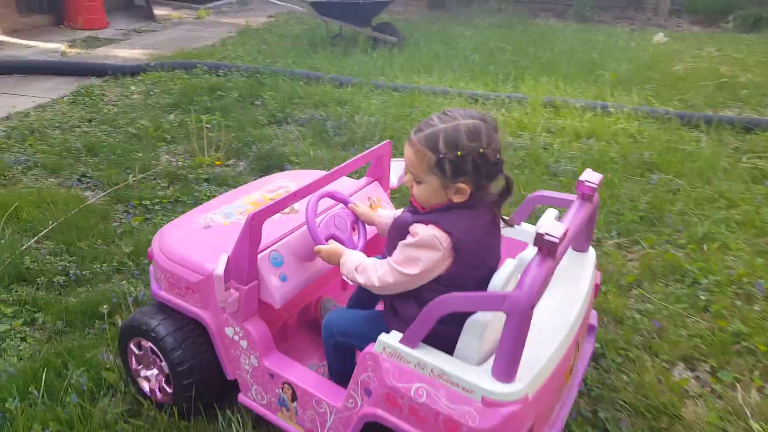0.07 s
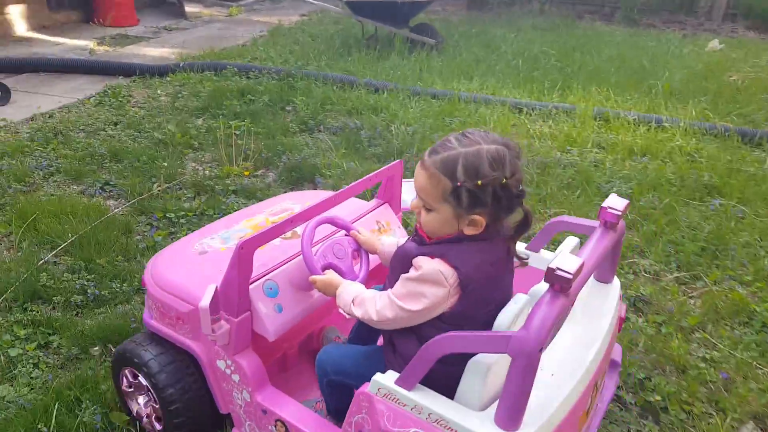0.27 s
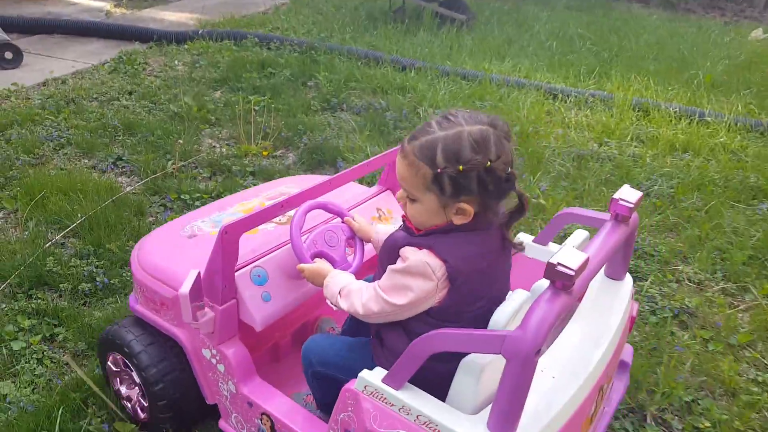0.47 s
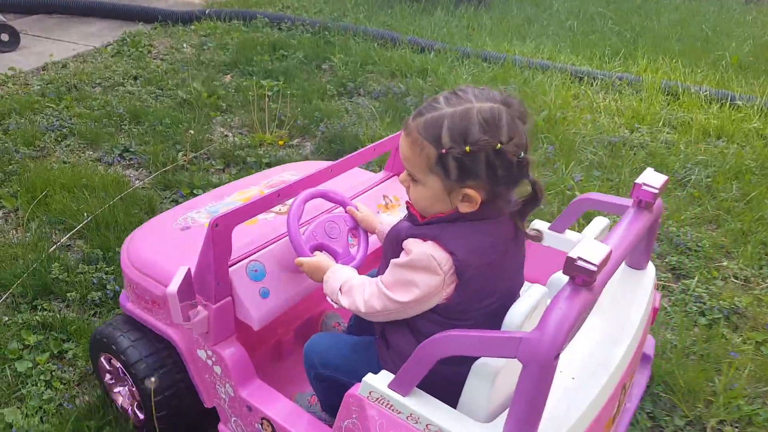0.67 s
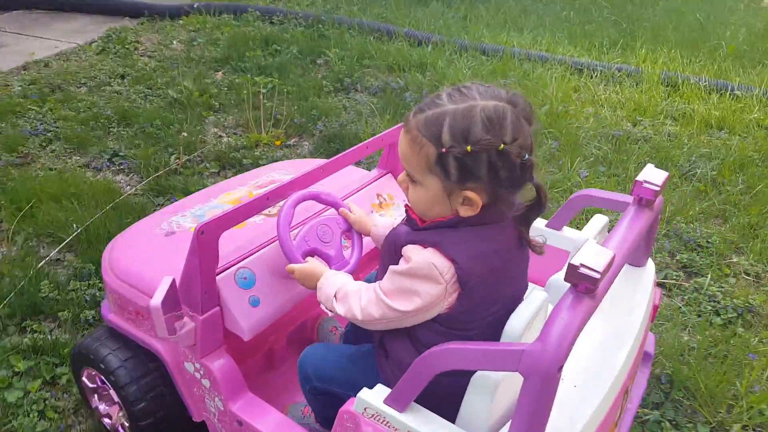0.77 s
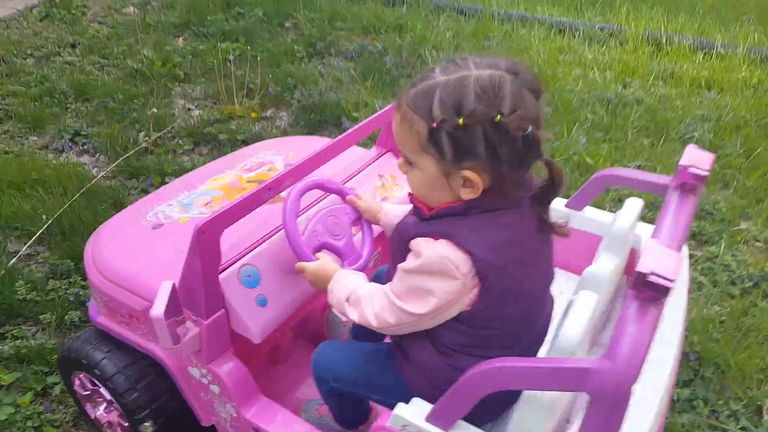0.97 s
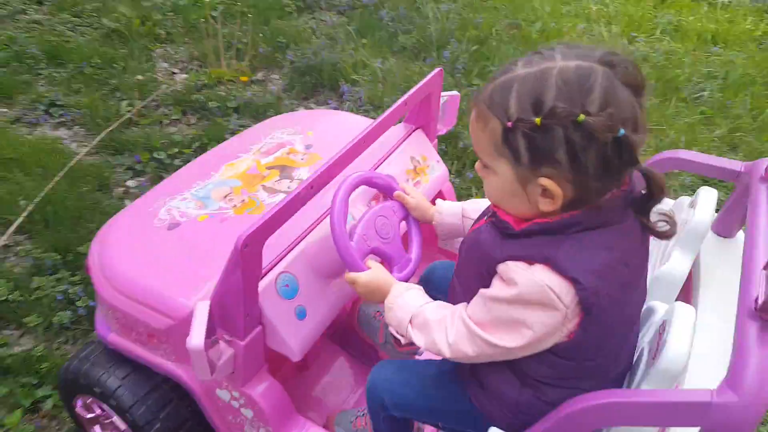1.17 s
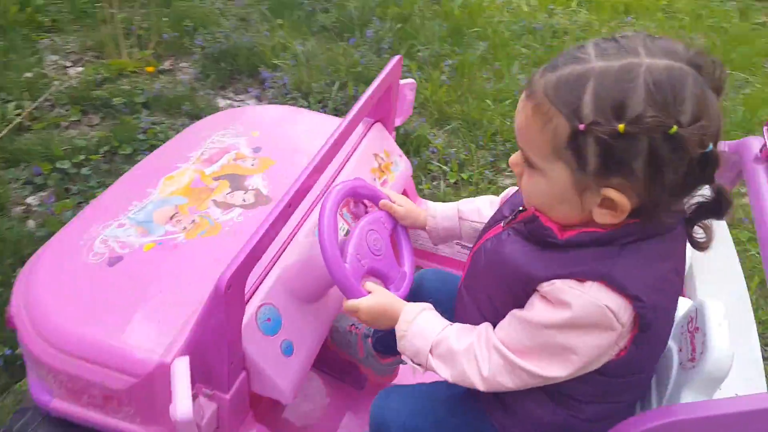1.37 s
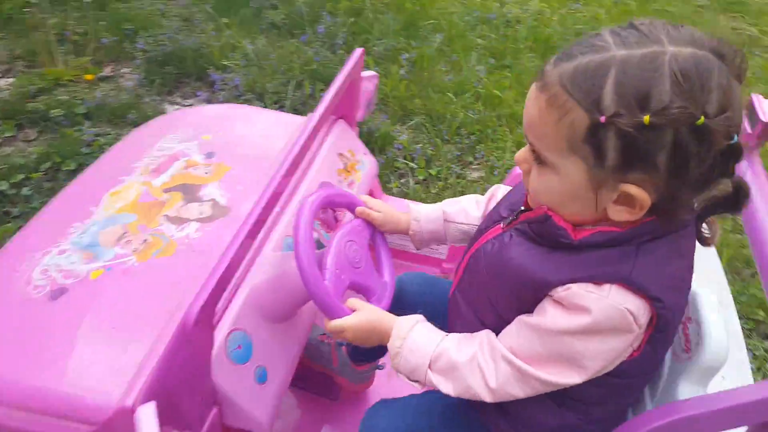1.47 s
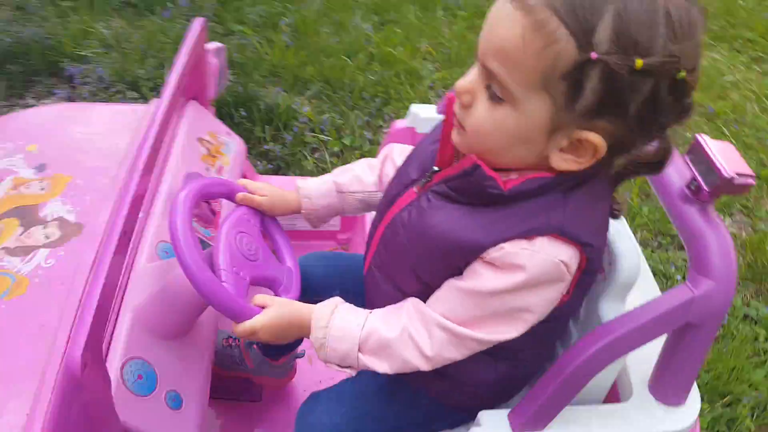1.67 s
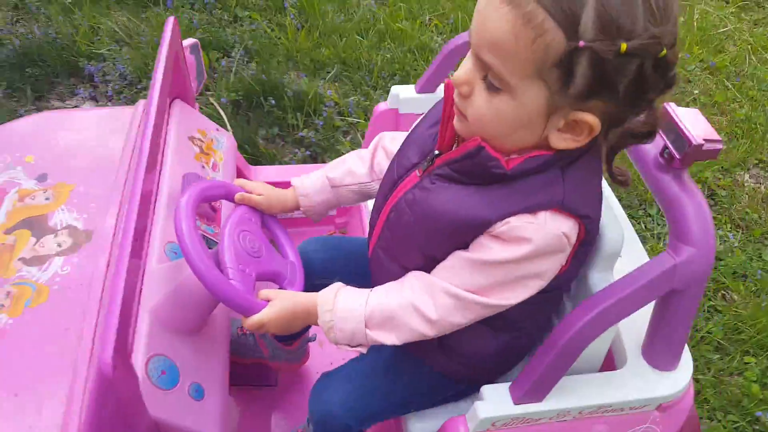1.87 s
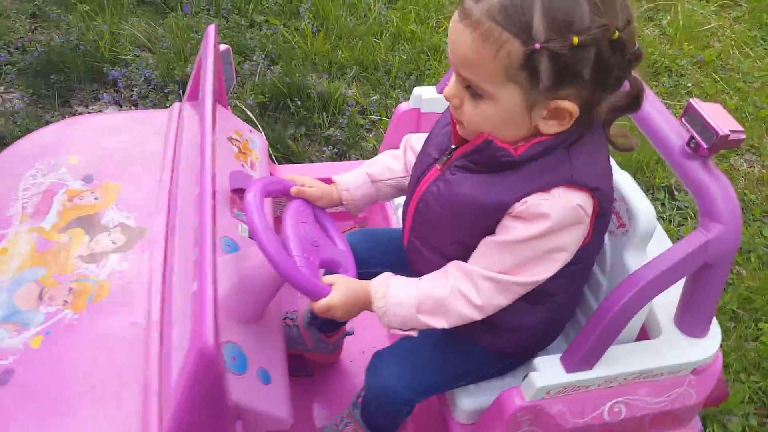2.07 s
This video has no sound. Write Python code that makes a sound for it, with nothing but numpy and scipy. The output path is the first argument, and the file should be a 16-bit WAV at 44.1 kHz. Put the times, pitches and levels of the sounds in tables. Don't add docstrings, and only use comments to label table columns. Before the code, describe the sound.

Close outdoor phone sound of a plastic electric toy car: five short grinding motor bursts with tearing grass, a quieter bumpy coast, one long rising whine that skips, then a heavy thump and rolling.

```python
import sys
import numpy as np
from scipy import signal
from scipy.io import wavfile

SR = 44100
rng = np.random.default_rng(int(sys.argv[2]) if len(sys.argv) > 2 else 0)


def decibels_to_gain(level_db):
    exponent = np.asarray(level_db, float) / 20
    return 10 ** exponent


def to_wav(s):
    ch = np.atleast_2d(s).T
    pcm = np.round(np.clip(ch, -1, 1) * 32767)
    wavfile.write(sys.argv[1], SR, pcm.astype(np.int16))


N = 93800
T = np.arange(N) / SR

# f/Hz, left-right likeness/1
LIKENESS = [(40, 0.5), (80, 0.95), (200, 1), (600, .89), (1300, 0.4), (2500, 0.016), (6000, 0.013)]
# f/Hz, left minus right/dB
LEAN = [(60, 3), (300, -0.5), (1400, 4), (3100, 2), (6000, -10), (9000, 2), (14000, 7)]


def at_hz(points, hz):
    table_hz, value = np.transpose(points)
    return np.interp(np.log(hz), np.log(table_hz), value)


def rms_one(x):
    return x / np.sqrt(np.mean(x ** 2) + 1e-20)


def drift(rate):
    r = np.exp(-40 * np.pi * rate / SR)
    noise = rng.standard_normal(N // 20 + 2002)
    slow = signal.lfilter([1], [1, -2 * r, r * r], noise)[2000:]
    return np.interp(np.arange(N) / 20, np.arange(len(slow)), rms_one(slow))


def swell(s, rise, hold, fall, db):
    before = np.minimum(T - s, 0) / rise
    after = np.maximum(T - s - hold, 0) / fall
    return decibels_to_gain(db) * np.exp(-before ** 2 - after ** 2)


def grains(rate, spread_db):
    excess = np.minimum(rng.exponential(1, (4, N)), 5)
    size = decibels_to_gain(spread_db * excess) * rng.choice([-1, 1], (4, N))
    struck = rng.random((4, N)) < rate / SR
    return (size * struck + 1e-9).reshape(2, 2, N)


def widen(mid, side, hz):
    alike = np.clip(at_hz(LIKENESS, hz), -1, 1)
    return np.sqrt(1 + alike) * mid + np.sqrt(1 - alike) * side * [[1], [-1]]


def coloured(source, spectrum, patchy_db):
    out = 0
    together = drift(14)
    edges = 35 * 2 ** np.arange(0, 9.1, .5)
    for k, (low, high) in enumerate(zip(edges, edges[1:])):
        hz = np.sqrt(low * high)
        if not spectrum[0][0] * .7 < hz < spectrum[-1][0] * 1.1:
            continue
        band = signal.butter(2, [low, high], "band", fs=SR, output="sos")
        mid, side = signal.sosfilt(band, source[k % 2])
        flicker_db = patchy_db * (1.2 * together + drift(40))
        lean_db = at_hz(LEAN, hz) / 2 * np.array([[1], [-1]])
        out = out + decibels_to_gain(at_hz(spectrum, hz) + flicker_db + lean_db) * widen(mid, side, hz)
    return rms_one(out)


def garden_air():
    # f/Hz, level/dB
    air_spectrum = [(40, -2), (144, -3.5), (400, -12.5), (900, -13), (2000, -20.5), (5000, -26.5),
                    (10500, -29.5), (15500, -27.5)]
    air_db = -45.5
    air = coloured(rng.standard_normal((2, 2, N)), air_spectrum, patchy_db=-0.74)
    return decibels_to_gain(air_db + 3.5) * air


def rolling():
    # t/s, level/dB
    roll = [(0, -39.5), (.2, -34.5), (.7, -39.5), (0.868, -32), (1.0, -43.5), (1.098, -47), (1.4, -57.5),
            (1.5, -78), (1.9, -29), (2.12, -35)]
    # f/Hz, level/dB
    roll_spectrum = [(40, -18), (70, -10), (156, -5), (309, -4), (654, -14), (1190, -17), (4000, -43)]
    s, db = np.transpose(roll)
    return decibels_to_gain(np.interp(T, s, db) + 3) * coloured(grains(2500, 2.5), roll_spectrum, patchy_db=.9)


def heaving():
    # t/s, rise/s, fall/s, level/dB
    heaves = [
        (.33, 0.021, 0.026, -46),
        (.97, 0.018, 0.015, -38),
        (1.3, 0.04, 0.037, -44),
        (1.66, 0.035, 0.04, -34),
        (1.94, .015, 0.023, -46),
    ]
    # f/Hz, level/dB
    heave_spectrum = [(40, -3), (70, 0), (130, -12)]
    heave = sum(swell(s, rise, 0, fall, db) for s, rise, fall, db in heaves)
    return heave * coloured(rng.standard_normal((2, 2, N)), heave_spectrum, patchy_db=1.0)


def torn_grass():
    # t/s, rise/s, fall/s, level/dB
    tears = [(.045, 0.0049, 0.012, -40.5), (.082, 0.0076, 0.042, -34.5), (.13, 0.0044, 0.012, -43),
             (.251, 0.0038, 0.016, -36.5), (.272, 0.011, .008, -36.5), (.29, 0.0044, 0.011, -40),
             (0.431, 0.023, 0.05, -34), (.485, 0.0055, .008, -40.5), (.52, .003, 0.0091, -40.5),
             (.553, 0.005, 0.019, -41.5), (.577, 0.0059, 0.017, -41), (.615, 0.035, 0.026, -38),
             (.665, 0.011, 0.012, -48), (.74, 0.013, 0.017, -34.5), (.758, 0.0054, 0.03, -34),
             (.8, 0.017, 0.024, -43), (.867, 0.0027, 0.016, -45), (1.34, 0.045, 0.049, -51.5),
             (1.6, 0.22, 0.18, -44), (1.78, 0.074, 0.055, -38.5), (1.885, 0.011, 0.019, -40),
             (1.945, 0.035, .01, -42)]
    # f/Hz, level/dB
    grass_spectrum = [(4500, 6), (6200, -6), (7300, -5), (10700, -4), (15000, -6.5)]
    tear = sum(swell(s, rise, 0, fall, db) for s, rise, fall, db in tears)
    return tear * coloured(grains(7000, 3.0), grass_spectrum, patchy_db=1.8)


def knocks():
    # t/s, crack level/dB,
    # boom level/dB, boom length/s
    hits = [(0.07, -20, -51, 0.012), (0.234, -28.5, -54, .015), (0.319, -46, -27, 0.018),
            (0.417, -10.5, -20.5, 0.031), (.985, -26, -36, 0.0085), (1.127, -30.5, -28.5, .02),
            (1.228, -24, -25.5, 0.017), (1.437, -20.5, -24, 0.0085), (1.747, -30.5, -24, 0.012),
            (1.763, -51, -39, .01), (1.779, -42, -21, 0.0079), (1.782, -39, -38, 0.0079),
            (1.92, -6.5, -13, 0.029), (1.982, -18, -30, 0.012), (1.989, -22, -38, 0.011)]
    # f/Hz, level/dB, t60/s
    modes = [(377, -7, 0.035), (441, 4, 0.03), (265, -9, 0.087), (556, -15, 0.045), (713, -6.5, 0.045),
             (900, -8, 0.039), (1330, -6, 0.032), (1750, -19, 0.049), (2450, -4, 0.0056)]
    contact_hz = 2500
    boom_hz, boom_drop_hz, boom_delay_s = 156, 51.2, 0.0071
    thud_hz, thud_db = 92, -20
    s, crack_db, boom_db, length = np.transpose(hits)
    out = np.zeros(N)
    luck = rng.normal(0, 2, (len(hits), len(modes) + 2))
    first = (s * SR).astype(int)
    rebound = ((s + .005 + .001 * luck[:, -1]) * SR).astype(int)
    for k, (hz, level_db, t60) in enumerate(modes):
        clicks = np.zeros(N) + 1e-18
        clicks[first] = decibels_to_gain(crack_db + level_db - 10 + luck[:, k])
        clicks[rebound] = -decibels_to_gain(crack_db + level_db - 3.5 - luck[:, k])
        r, w = decibels_to_gain(-60 / (t60 * SR)), 2 * np.pi * hz / SR
        out += signal.lfilter([0, np.sin(w)], [1, -2 * r * np.cos(w), r * r], clicks)
    out = signal.sosfilt(signal.butter(2, contact_hz, fs=SR, output="sos"), out)
    for at, db, span in zip(s, boom_db, length):
        hz = boom_hz + boom_drop_hz * np.exp(-np.abs(T - at) / 0.009)
        boom = np.sin(2 * np.pi * np.cumsum(hz) / SR)
        thud = decibels_to_gain(thud_db) * np.sin(2 * np.pi * thud_hz * (T - at))
        out += swell(at + boom_delay_s, 0.0014, 0, span, db) * np.sqrt(2) * (boom + thud)
    return out * decibels_to_gain(np.array([[1.0], [-1.0]]))


def gearbox():
    # t of full load/s, rise/s, hold/s, fall/s, rattle level/dB
    surges = [(.0, 0.016, 0.035, 0.069, -31.5), (0.082, 0.019, 0.013, 0.065, -26),
              (0.268, 0.056, 0.026, 0.037, -25), (0.421, 0.04, 0.028, 0.064, -23.5),
              (0.599, 0.06, 0.027, 0.057, -25), (0.75, 0.037, 0.024, 0.049, -23.5),
              (1.462, 0.019, 0.25, 0.19, -23), (1.744, 0.068, 0.06, 0.0089, -35),
              (1.993, 0.011, 0.0071, 0.085, -31.5), (1.427, 0.007, .01, 0.011, -38),
              (1.775, 0.0036, 0.011, 0.0038, -24.5), (1.821, 0.0061, 0.0053, 0.0082, -51),
              (0.863, 0.036, 0.027, 0.027, -47)]
    # f/Hz, width/Hz, level/dB
    resonances = [(173, 104, -5), (436, 120, -29), (763.5, 204, -1), (2900, 110, -2), (4250, 330, -15),
                  (5800, 500, -24), (8000, 1100, -29)]
    # f/Hz, level/dB per Hz
    rattle_spectrum = [(90, -34), (164, 4), (286, -0.5), (430, 1.5), (1000, -4), (1850, -1.5), (3200, -12),
                       (8000, -42.5)]
    shell_db, top_hz = -10, 7850
    dip_hz, dip_width_hz, dip_share = 3600, 600, .55
    teeth = grains(3500, 3.0)
    shell = 0
    for k, (hz, width, db) in enumerate(resonances):
        r = np.exp(-np.pi * width / SR)
        poles = [1, -2 * r * np.cos(2 * np.pi * hz / SR), r * r]
        mid, side = signal.lfilter([1 - r * r, 0, r * r - 1], poles, teeth[k % 2])
        shell = shell + decibels_to_gain(db) * widen(mid, side, hz)
    load = sum(swell(*row) for row in surges)
    body = coloured(teeth, rattle_spectrum, patchy_db=1.1)
    body = body + decibels_to_gain(shell_db) * rms_one(shell)
    dip = signal.lfilter(*signal.iirpeak(dip_hz, dip_hz / dip_width_hz, fs=SR), body)
    top = signal.butter(2, top_hz, fs=SR, output="sos")
    return load * signal.sosfilt(top, body - dip_share * dip)


def whine(hz, gain, uneven):
    # f/Hz, turn/rad
    whine_turn = [(400, 0.13), (1500, 0.94), (3100, 1.89)]
    wobble_db, waver = 3.6, .02
    phase = 2 * np.pi * np.cumsum(hz * (1 + uneven * waver * drift(80))) / SR
    side = np.array([[.5], [-.5]])
    level_db = uneven * wobble_db * drift(70) + side * at_hz(LEAN, hz)
    return gain * decibels_to_gain(level_db) * np.sqrt(2) * np.sin(phase + side * at_hz(whine_turn, hz))


def motor_bites():
    # t/s, length/s, start f/Hz, end f/Hz, level/dB
    sags = [(.0, 0.052, 1750, 1960, -34.5), (.0, 0.077, 926, 1047, -36.5), (0.076, .032, 2370, 1750, -28.5),
            (.108, 0.027, 1600, 1144, -28.5), (0.112, 0.016, 2900, 2780, -29.5),
            (0.262, 0.061, 2300, 857, -30.5), (0.282, 0.021, 3160, 2565, -34.5),
            (.418, 0.06, 2044, 1934, -25.5), (0.47, 0.033, 3070, 2450, -27),
            (0.49, 0.016, 1300, 1120, -28.5), (0.567, 0.07, 1900, 1653, -25.5),
            (0.608, 0.0155, 3400, 3270, -34), (0.616, .026, 2950, 2910, -29),
            (0.742, 0.044, 1955, 1705, -30), (0.773, 0.025, 3154, 2500, -29.5),
            (1.802, 0.0099, 4750, 4650, -38), (1.817, 0.026, 4550, 4230, -39.5),
            (1.991, 0.058, 2500, 2710, -39.5), (1.75, .03, 5900, 5900, -44),
            (1.775, 0.016, 4430, 4400, -35), (1.772, 0.033, 2350, 2670, -26.5)]
    # t/s, length/s, start f/Hz, end f/Hz, level/dB
    groans = [
        (0.063, 0.051, 438.6, 507, -31),
        (0.232, 0.046, 331, 532, -26),
        (0.551, 0.099, 350, 541, -32),
        (0.711, 0.0836, 344, 552, -29.5),
        (1.96, 0.11, 504, 730, -33.5),
    ]
    out = 0
    for s, length, start_hz, end_hz, db in sags + groans:
        hz = np.interp(T, [s, s + length], [start_hz, end_hz])
        out = out + whine(hz, swell(s + .008, .008, length * .6, length / 5, db), .75)
    return out


def long_pull():
    # t/s, f/Hz, level/dB
    near = [(1.43, 1130, -59), (1.445, 1195, -23.5), (1.47, 1357, -28.5), (1.5, 1556, -30.5),
            (1.58, 1500, -32.5), (1.65, 1511, -26), (1.72, 1759, -26), (1.75, 1850, -35), (1.79, 1900, -59)]
    buzz = [(1.43, 2300, -72), (1.447, 2450, -29.5), (1.475, 2750, -37), (1.5, 3060, -33),
            (1.56, 3130, -35), (1.62, 3054, -33), (1.675, 3010, -37), (1.71, 3350, -34), (1.75, 3500, -60)]
    far = [(1.46, 1400, -55), (1.51, 1750, -32), (1.55, 1900, -29), (1.62, 1880, -31), (1.7, 1880, -28),
           (1.75, 1900, -27), (1.77, 1900, -50)]
    mesh = [(1.46, 300, -53), (1.5, 374.6, -32.5), (1.53, 417, -28), (1.63, 435.3, -31), (1.69, 436, -22.5),
            (1.78, 438.4, -25.5), (1.85, 440, -58)]
    # multiple of f/1, level/dB
    near_orders = [(1, 0)]
    buzz_orders = [(1, 0), (1.51, -10), (2.5, -24)]
    far_orders = [(.64, -10), (1, 1.5), (1.11, -35), (1.22, -19), (1.32, -10), (1.41, -13), (3.04, -19)]
    mesh_orders = [(.8, -10), (1, 1), (1.24, -11.5), (1.7, -8.5), (1.93, -12.5)]
    # t/s, share of a bite's unevenness/1
    judder = [(1.48, .3), (1.52, .65), (1.67, .7), (1.71, 1.25)]
    # t/s, half length/s, share lost/1
    skips = [
        (1.704, 0.0036, 0.36),
        (1.727, .006, 0.49),
        (1.757, 0.006, 0.46),
        (1.764, 0.0029, 0.27),
        (1.817, 0.0044, .5),
    ]
    lost_grip = sum(lost * swell(s, half, 0, half, 0) for s, half, lost in skips)
    grip = 1 - np.clip(lost_grip, 0, 1)
    uneven = np.interp(T, *np.transpose(judder))
    out = 0
    for rows, orders in ((near, near_orders), (buzz, buzz_orders), (far, far_orders), (mesh, mesh_orders)):
        s, hz, db = np.transpose(rows)
        on = grip * decibels_to_gain(np.interp(T, s, db, left=-120, right=-120))
        for k, order_db in orders:
            out = out + whine(k * np.interp(T, s, hz), on * decibels_to_gain(order_db), uneven if k < 1.45 else 1.1)
    return out


def scene():
    lawn = garden_air() + rolling() + heaving() + torn_grass()
    car = knocks() + gearbox() + motor_bites() + long_pull()
    return lawn + car


def top_cut(x):
    return signal.sosfilt(signal.butter(12, 15800, fs=SR, output="sos"), x)


def record(dry):
    peak, low_hz, droop_hz, top_hz = .5, 44.6, 14000, 15720
    x = peak * np.tanh(dry / peak)
    x = signal.sosfilt(signal.butter(4, low_hz, "high", fs=SR, output="sos"), x)
    x = signal.sosfilt(signal.butter(2, droop_hz, fs=SR, output="sos"), x)
    x = signal.sosfilt(signal.ellip(10, 1, 40, top_hz, fs=SR, output="sos"), x)
    return top_cut(x)


dry = scene()
out = record(dry)
to_wav(out)
```